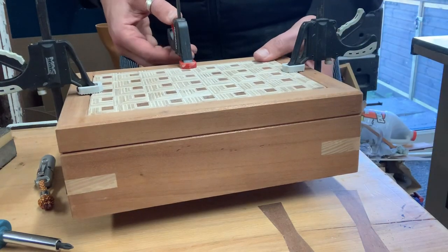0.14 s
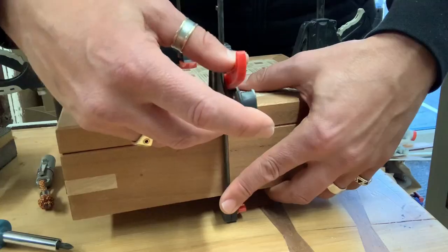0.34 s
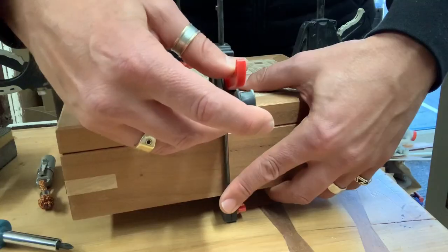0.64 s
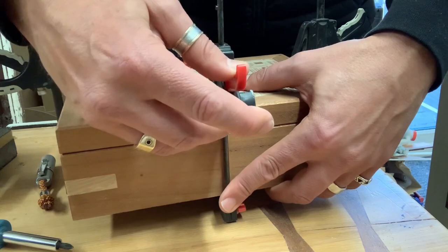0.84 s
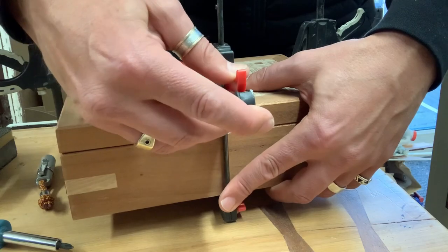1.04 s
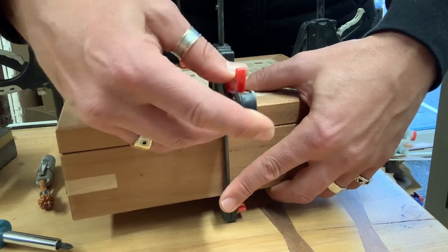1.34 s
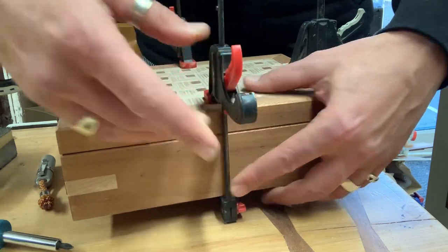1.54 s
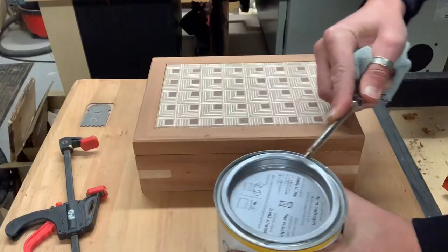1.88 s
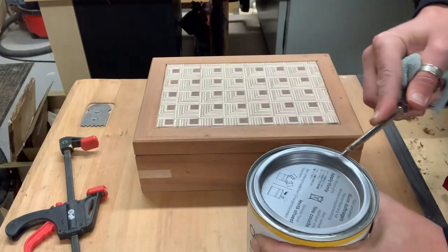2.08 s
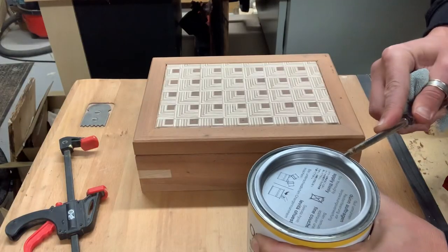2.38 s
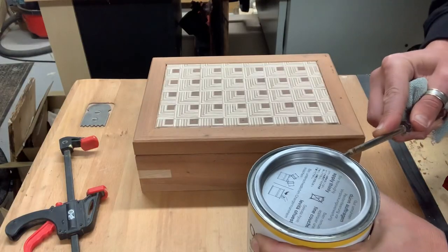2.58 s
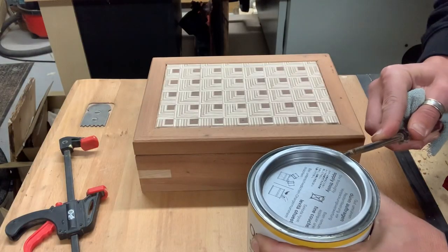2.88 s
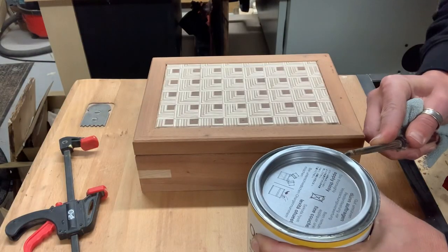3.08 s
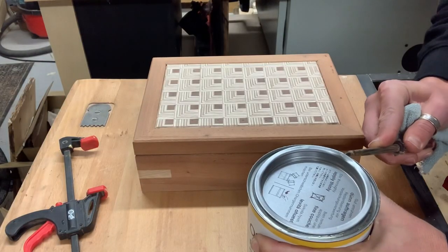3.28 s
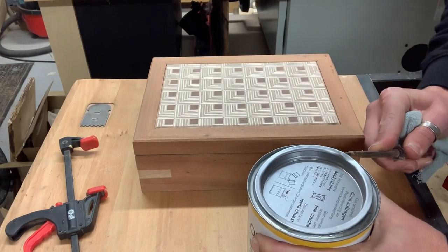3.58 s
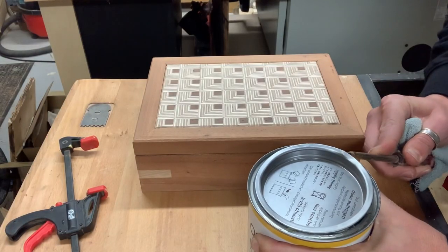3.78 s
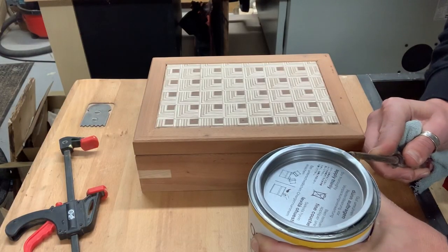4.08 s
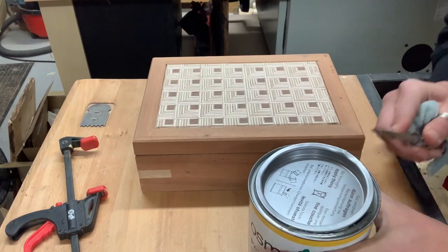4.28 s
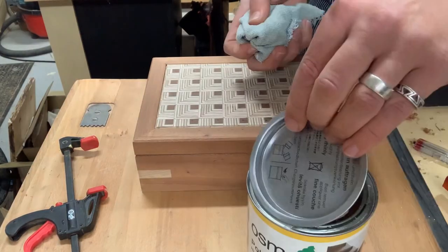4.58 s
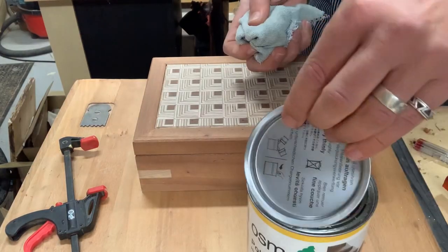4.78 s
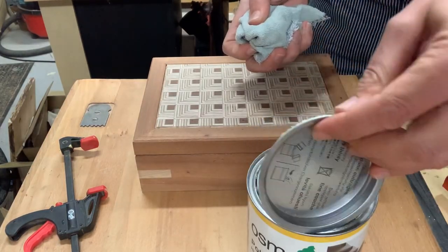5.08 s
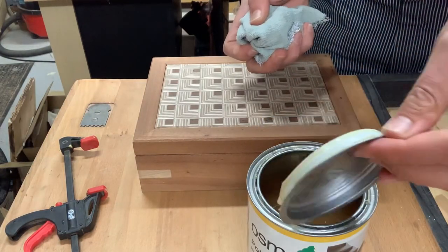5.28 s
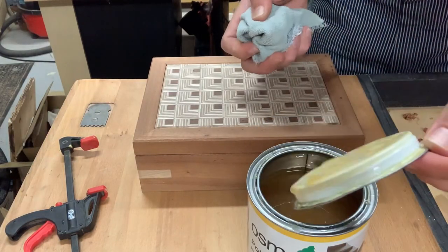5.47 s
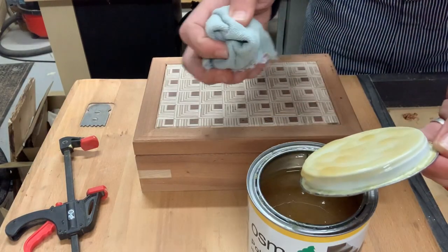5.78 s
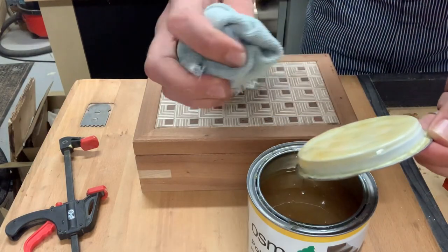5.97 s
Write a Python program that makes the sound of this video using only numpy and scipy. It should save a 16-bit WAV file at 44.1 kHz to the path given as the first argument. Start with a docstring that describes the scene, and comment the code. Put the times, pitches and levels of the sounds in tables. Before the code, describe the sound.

A nearby phone microphone picks up soft wooden bumps and a clamp sliding loose in near silence. Suddenly broad fan noise fills the small shop. A tin judders briefly over the bench, followed by five very loud, short tinny snaps at uneven intervals, with a woody thump beneath. The tool slips with a knock and rasp, light metal clicks follow, and the fan continues to the end.

```python
"""A workbench close to a phone with two microphone ports. First a quiet shop: hands knock a wooden box,
with small ticks and rubs, and slide a clamp off. After a cut an extractor fan roars steadily as filtered
noise; a paint tin is dragged near in irregular slips, and a screwdriver pops its lid round the rim five times,
ringing tin, lid and bench modes. It slips and scrapes, and the lid is lifted with small ticks."""
import sys
import numpy as np
from scipy import signal
from scipy.fft import rfft, irfft, next_fast_len
from scipy.io import wavfile
from scipy.ndimage import uniform_filter1d

SR = 44100
rng = np.random.default_rng(int(sys.argv[2]) if len(sys.argv) > 2 else 0)


def dump(signal):
    """Clip the signal to [-1, 1] and save it as 16-bit WAV at the path in sys.argv[1]."""
    limited = np.clip(np.atleast_2d(signal).T, -1, 1)
    pcm = np.round(limited * 32767).astype(np.int16)
    wavfile.write(sys.argv[1], SR, pcm)


N = 270333
T = np.arange(N) / SR  # seconds
CUT_S = 1.779  # the quiet shop gives way to the fan
# Bending waves carry low notes slowly: each mode peaks this many of its own cycles late.
WOOD_LATE_CYCLES, TIN_LATE_CYCLES = 2.3, 0.13

# Ringing modes of the wooden box and bench. Each row: pitch in Hz, level in dB, time to fall 60 dB in seconds.
BENCH_MODES = [(90.5, -5.5, 0.27), (158.2, -2.5, 0.17), (178, 4.5, 0.071), (246.2, -3.5, 0.081),
               (264.8, -6.5, 0.047), (349.7, 3.5, 0.039), (379.5, 0, 0.072), (463, 2, 0.087),
               (517.4, -6, 0.23), (681.6, -6.5, .1), (910, -3, 0.1), (1264, -8, .06), (1550, -13, 0.017)]
# Ringing modes of the paint tin. Each row: pitch in Hz, level in dB, time to fall 60 dB in seconds.
TIN_MODES = [(556, -9, .06), (650, -10.5, .07), (731.4, 0, 0.072), (832, -4, 0.045), (868, -6, 0.045),
             (970, -6.5, 0.02), (1005, -6.5, .06), (1326, 0, 0.043), (1372, 7.5, 0.018),
             (1442, -1.5, 0.045), (1567, -7.5, 0.037), (1676, 0.5, 0.053), (1640, -14, 0.019),
             (1790, -18, 0.026), (2050, -27.5, 0.012), (2200, -14.5, .05), (2520, -15.5, 0.036),
             (3040, -5.5, 0.06), (3705, -18.5, .06)]
# Likeness of the two ports in a diffuse field. Each row: frequency in Hz, likeness from 0 to 1.
PORT_LIKENESS = [(25, .6), (130, .78), (300, .4), (640, .1), (4000, .1), (6500, .45), (7400, 1), (9300, 1),
                 (10500, .7), (11800, 1), (20000, 1)]


def undb(db):
    """Decibels to amplitude gain."""
    return 10 ** (np.asarray(db) / 20)


def on_hz(table, size):
    """A (Hz, value) table on the bins of a transform, straight on log frequency."""
    t = np.array(table, float)
    bins_hz = np.fft.rfftfreq(size, 1 / SR)
    return np.interp(np.log(bins_hz + 1), np.log(t[:, 0]), t[:, 1])


def noise(spectrum, alike=None):
    """Two-port noise of rms 1; without a likeness table it is the same at both ports."""
    size = next_fast_len(N)
    a, b = rfft(rng.standard_normal((2, size))) * undb(on_hz(spectrum, size))
    c = 1 if alike is None else on_hz(alike, size)
    x = irfft(np.array([a, c * a + np.sqrt(1 - c ** 2) * b]), size)[:, :N]
    return x / x.std()


def walk(rate):
    """Random levels held 1 / rate s and slewed twice; spread near 1."""
    k = int(SR / rate)
    steps = np.repeat(rng.standard_normal(N // k + 1), k)
    return 1.5 * uniform_filter1d(uniform_filter1d(steps, k), k)[:N]


def ring(modes, push_ms, scatter_db, favour_hz=0, damping=1, focus_db=11, late_cycles=WOOD_LATE_CYCLES):
    """Half a second of modes set off by a half-sine push, low ones swelling later, strengths varied. Peak 1."""
    t = T[:SR // 2]
    hz, db, t60 = np.transpose(modes)[:, :, None]
    chance = rng.standard_normal((2, len(modes), 1))  # each blow lands elsewhere
    if favour_hz:  # modes near the struck spot's own pitch answer most
        db = db - focus_db * np.minimum(abs(np.log2(hz / favour_hz)), 1.5)
    late = late_cycles / hz
    swell = np.clip(t / late, 0, 1) ** 2
    tone = np.sin(2 * np.pi * hz * (1 + .006 * chance[1]) * (t - late))
    fall_db = 60 * np.maximum(t - late, 0) * damping / t60
    x = swell * undb(db + scatter_db * chance[0] - fall_db) * tone
    k = max(push_ms * SR / 1000, 2)  # push length in samples
    push = np.sin(np.pi * np.arange(0, k) / k)
    x = np.convolve(x.sum(0), push)[:len(t)]
    return x / abs(x).max()


def burst(hz_lo, hz_hi, t60):
    """A dying spray of band noise, peak near 1."""
    t = T[:SR // 2]
    band = signal.butter(2, [hz_lo, hz_hi], "band", fs=SR, output="sos")
    x = signal.sosfilt(band, rng.standard_normal(len(t)))
    return x / (2 * x.std()) * undb(-60 * t / t60)


def add(track, s, x):
    """Lay a sound on the track from s seconds."""
    i = int(s * SR)
    track[i:i + len(x)] += x[:N - i]


def stroke(start_s, hold_s, swell_s, fade_s):
    """Gain of a sliding contact: swells evenly in dB, holds at 1, fades."""
    away = np.maximum((start_s - T) / swell_s, (T - start_s - hold_s) / fade_s)
    return undb(-30 * np.maximum(away, 0))  # 30 dB over each swell or fade time


def shop():
    """Quiet air of the shop before the cut: diffuse low noise that wavers in level."""
    # Each row: frequency in Hz, level in dB per Hz.
    shop_spectrum = [(15, -28), (25, 8), (148, -17.5), (332, -16), (642, -16), (1730, -22), (1890, -25),
                     (2000, -36), (2600, -59.5), (4400, -120)]
    return noise(shop_spectrum, PORT_LIKENESS) * undb(-82 + 0.94 * walk(11.0))


def self_noise():
    """The microphones' own steady hiss, a little louder after the cut."""
    # Each row: frequency in Hz, level in dB per Hz.
    hiss_spectrum = [(800, -19.5), (2000, -1), (12000, -3.5), (14500, -14.5), (15200, -32)]
    return noise(hiss_spectrum, PORT_LIKENESS) * undb(np.where(T < CUT_S, -85, -82.5))


def knocks():
    """Dull blows on hollow wood, each with a contact click 2.2 ms after its start."""
    # Each row: start in seconds, level in dB, click against that level in dB, push in ms,
    # favoured pitch in Hz, damping by the hand as a factor on the decay rate (at least 0.3 is used).
    blows = [(0.008, -58, -13.5, 2.1, 179, 0.28), (0.036, -54.5, -10.5, 2, 180, 0.51),
             (0.079, -53.5, 3.5, 2, 350, 0.89), (0.1, -40, -9, 1.94, 387, 0.78),
             (0.119, -49.5, -9, 1.9, 240, 2), (0.132, -47, -16, 2, 103, 2.1),
             (0.28, -66.5, -10, 2.8, 100, 1.4), (0.328, -40, -6, 0.98, 258, 0.88),
             (0.342, -36.5, -42, 1.5, 167, 0.76), (0.476, -68, 3, 0.75, 322, 1.8),
             (0.493, -43.5, -38, 2, 232, 1.9), (0.596, -42.5, -43, 2.3, 188, 1.4),
             (0.656, -60, -30, 1.3, 144, 3.1), (0.745, -59, -21, 0.77, 128, 5.6),
             (0.779, -52.5, -12.5, 3.3, 234, 1.8), (1.057, -42.5, -41, 2.8, 209, 0.83),
             (1.215, -53.5, -50, 2.4, 314, 2.1), (1.327, -61, -24, 2.3, 197, 0.4),
             (1.38, -24.5, -16, 0.28, 218, 1.47), (1.408, -33, -34, 0.69, 187, 0.61),
             (3.76, -30, -5, 1.6, 294, 0.59), (3.793, -33.5, -5.5, 2.9, 214, 4.4)]
    out = np.zeros(N)
    for s, db, click_db, push_ms, hz, damping in blows:
        wood = ring(BENCH_MODES, push_ms, 0.88, hz, max(damping, .3))
        add(out, s, undb(db) * wood)
        click = burst(350, 1380, 0.091) + undb(-10.0) * burst(2100, 11000, 0.012)
        add(out, s + 0.0022, undb(db + click_db) * click)
    return out


def ticks():
    """Tiny hard contacts of steel on clamp and rim, many with a clear tin ring."""
    # Each row: start in seconds, level in dB, then against it tin ring in dB and top treble in dB,
    # and brightest pitch in Hz.
    contacts = [(0.0823, -56, -2, -18, 5930), (0.1026, -45.5, -5, -24, 5320), (0.904, -72.5, -3, 8, 3490),
                (1.3762, -50, 3, -27, 3940), (1.4413, -50.5, -4, -7, 4830), (3.6696, -64, 10, -15, 3600),
                (4.2053, -48, 14, 4.5, 5040), (4.2243, -50, 6, -5, 3230), (4.261, -58, 14, 8, 4130),
                (4.269, -55, 2, 3, 4100), (4.277, -56, 0, 11, 3380), (4.59, -61, 4, -9, 5150),
                (4.5967, -58, -14, -2, 3450), (4.6176, -47.5, 7.5, 12.5, 5130), (4.8424, -56, 0, -20, 4100)]
    out = np.zeros(N)
    for s, db, tin_db, top_db, hz in contacts:
        ping = burst(hz / 1.07, hz * 1.07, .03)
        click = ping + undb(-1) * burst(2900, 8950, 0.02) + undb(top_db) * burst(6000, 12200, 0.019)
        tin = ring(TIN_MODES, 0.078, 2.6, 1800, focus_db=2.2, late_cycles=TIN_LATE_CYCLES)
        add(out, s, undb(db) * (click + undb(tin_db) * tin))
    return out


def rubs():
    """Skin and steel slide: a grainy hiss and rasp that catch together."""
    # Each row: hold start in seconds, hold, swell and fade in seconds, hiss in dB, rasp in dB,
    # rasp centre in Hz, rasp width in octaves, hiss tilt in dB per octave.
    slides = [(0.174, .005, 0.26, 0.13, -74.5, -76, 3400, 1.2, -11),
              (0.792, .01, 0.022, 0.035, -80, -83.5, 3550, 1.3, -12),
              (1.444, .004, 0.049, 0.18, -68.5, -67.5, 3740, 0.94, -10),
              (1.58, 0.197, 0.36, .006, -78.5, -75.5, 3720, 3.3, 3),
              (1.892, .11, 0.089, 0.13, -69.5, -67.5, 3500, 1.8, 23.5),
              (3.68, 0.043, 0.026, .05, -62.5, -84, 3600, 2.2, -11.5),
              (3.752, 0.029, 0.062, 0.036, -41, -46.5, 3340, 3.4, -5),
              (4.285, .006, 0.079, 0.056, -61, -68.5, 4000, 1.2, -2),
              (4.23, .12, 0.08, .15, -95, -58.5, 850, 2.6, 2),
              (4.616, .002, 0.012, .05, -64, -62, 4500, 1.4, -3),
              (5.014, 0.042, .05, 0.35, -88, -73.5, 4820, 0.53, -5)]
    # Hiss before its tilt. Each row: frequency in Hz, level in dB per Hz.
    hiss_spectrum = [(4000, -40), (6500, -6), (9000, -2), (12000, 0), (14500, -2), (15600, -14)]
    grain = undb(3.4 * walk(300))
    out = 0
    for s, hold_s, swell_s, fade_s, hiss_db, rasp_db, hz, octaves, tilt_db in slides:
        hiss = noise([(f, d + tilt_db * np.log2(f / 12000)) for f, d in hiss_spectrum])[0]
        rasp_spectrum = [(hz / 2 ** (3 * octaves), -40), (hz / 2 ** (octaves / 2), -3), (hz, 0),
                         (hz * 2 ** (octaves / 3), -4), (hz * 2 ** octaves, -40)]
        rasp = noise(rasp_spectrum)[0]
        contact = undb(hiss_db) * hiss + undb(rasp_db) * rasp
        out = out + stroke(s, hold_s, swell_s, fade_s) * grain * contact
    return out


def fan():
    """Broad air roar with wavering duct resonances."""
    # Each row: frequency in Hz, level in dB per Hz.
    roar_spectrum = [(15, -78), (25, -26.5), (91, -14), (161, -17), (190, -10), (240, -14.5), (327, -5.5),
                     (385, -9), (444, -11), (589, -5.5), (1060, -11), (1870, -13.5), (7000, -45.5),
                     (9100, -74), (15400, -120)]
    # Duct resonances. Each row: pitch in Hz, width in Hz, level in dB against the roar.
    duct_modes = [(102.2, 8, -28), (195.6, 10, -14.5), (445.4, 31.6, -5), (691.5, 27, -11.5),
                  (1076.5, 44, -9), (1193, 58, -20), (1625, 80, -27.5), (1843, 41, -14.5), (2490, 120, -18),
                  (3253, 930, -16.5)]
    before_lift = T < 4.74  # a second cut: the fan is heard from a slightly other place
    roar_db = np.where(before_lift, -54, -55.5)
    hum_db = np.where(before_lift, -2, 2)  # extra level of the one resonance between 400 and 500 Hz
    out = noise(roar_spectrum, PORT_LIKENESS) * undb(1.0 * walk(14))
    for hz, width_hz, mode_db in duct_modes:
        peak = [(hz - 3 * width_hz, -60), (hz - width_hz / 2, -4), (hz, 0),
                (hz + width_hz / 2, -4), (hz + 3 * width_hz, -60)]
        level_db = mode_db + 1.1 * walk(24) + hum_db * (400 < hz < 500)
        out = out + noise(peak, PORT_LIKENESS) * undb(level_db)
    return out * undb(roar_db)


def drag():
    """Irregular slips of the tin's foot shake the bench and rattle the tin."""
    slips_per_s = np.array([[1500], [900]])  # bench, tin
    slips = (rng.random((2, N)) < slips_per_s / SR) * rng.standard_normal((2, N))
    bench = ring(BENCH_MODES, 4.5, 0, 92, 2.1)
    tin = ring(TIN_MODES, 0.12, 0, damping=2.73, late_cycles=TIN_LATE_CYCLES)
    low = signal.fftconvolve(slips[0], bench)[:N]
    rattle = signal.fftconvolve(slips[1], tin)[:N]
    push = stroke(1.892, 0.12, swell_s=0.081, fade_s=0.26)
    return push * (undb(-39) * low / low.std() + undb(-52) * rattle / rattle.std())


def pops():
    """The lid edge snaps free: tin, lid and bench ring, steel cracks and clatters, the seal hisses."""
    # Each row: start in seconds, level in dB, then against it bench thump, crack, seal hiss and lid ring in dB,
    # lid pitch in Hz, lid ringing time in seconds, favoured tin pitch in Hz, tin damping as a factor.
    snaps = [(2.2184, -0.5, -22.5, -5, -56, -21, 704.5, 0.13, 1285, 1),
             (2.6589, -3, -14, -25.5, -50, -22.5, 712.5, .14, 690, 1.2),
             (2.949, -6, -25, -35.5, -60, -21, 745, 0.12, 785, 0.67),
             (3.25, -2.5, -16.5, -24.5, -53, -31, 711.4, 0.16, 1300, 1.4),
             (3.482, 1.5, -20, -29, -50, -23.5, 765.6, 0.11, 754, 1.5)]
    # Split lid mode. Each row: multiple of the lid pitch, level in dB, time to fall 60 dB in seconds.
    lid_modes = [(0.956, -6.5, 0.45), (1.003, -14.5, 0.99), (1.042, -5.5, .35)]
    out = np.zeros(N)
    rattle = undb(2.2 * walk(53))  # the loose lid rattles as it rings
    for s, db, thump_db, crack_db, hiss_db, lid_db, lid_hz, lid_s, hz, damping in snaps:
        # the lid edge strikes the rim again 3.11 ms later, 7.5 dB weaker
        for lag_s, blow_db in ((0, 0), (0.00311, -7.5)):
            tin = ring(TIN_MODES, 0.29, 0.92, hz, damping, focus_db=5.0, late_cycles=TIN_LATE_CYCLES)
            add(out, s + lag_s, -undb(db + blow_db) * tin)
        lid = ring(np.array(lid_modes) * [lid_hz, 1, 1], 1.0, 0.45, late_cycles=TIN_LATE_CYCLES)
        lid *= rattle[int(s * SR):][:SR // 2]
        # the hand damps the lid and stops its ringing, at 898 dB per second
        lid *= undb(-898 * np.maximum(T[:SR // 2] - lid_s, 0))
        clatter = undb(-11) * burst(500, 1500, 0.034)
        clatter += undb(-38.5) * burst(1445, 2380, 0.29) + undb(-34.5) * burst(980, 13000, 0.009)
        crack = undb(crack_db) * burst(8500, 15000, 0.0074)
        seal_hiss = undb(hiss_db) * burst(4500, 15000, 0.16)
        add(out, s, undb(db) * (undb(lid_db) * lid + clatter + crack + seal_hiss))
        # the blow reaches the bench through the tin
        thump = ring(BENCH_MODES, 1.0, 0.65, 230, 0.77, focus_db=5.5, late_cycles=1.1)
        add(out, s, undb(db + thump_db) * thump)
    return out


def room(x):
    """The shop answers with a diffuse tail of decaying noise bands, each with its own decay time."""
    # Each row: band centre in Hz, time to fall 60 dB in seconds, level in dB.
    room_bands = [(60, 1, -5), (254.4, 0.15, -6), (940, 0.26, -9), (4000, 0.1, -2), (12000, 0.24, -19)]
    t, tail = T[:SR // 2], 0
    spray = noise([(20, 0), (20000, 0)], PORT_LIKENESS)[:, :len(t)]
    for hz, t60, db in room_bands:
        band = signal.butter(1, [hz / 2, min(hz * 2, .45 * SR)], "band", fs=SR, output="sos")
        decay = signal.sosfilt(band, spray) * undb(-60 * t / t60) * np.clip(t / 0.0007, 0, 1)
        # long and short decays are scaled to like energy
        tail = tail + undb(db) * decay / np.sqrt(t60 * SR / (2 * np.log(1000)))
    return signal.fftconvolve(x[None], tail, axes=1)[:, :N]


def scene():
    """Close sounds with their room tail, over the shop air, then the fan, and the microphone hiss."""
    near = knocks() + ticks() + rubs() + drag() + pops()
    # small things radiate no deep bass
    near = signal.sosfilt(signal.butter(3, 96, "high", fs=SR, output="sos"), near)
    after = np.clip((T - CUT_S) / 0.012, 0, 1)
    return near + room(near) + (1 - after) * shop() + after * fan() + self_noise()


def record(dry):
    """The right port hears more bass and a phase that turns in the treble; peaks are rounded, the top is cut."""
    # Right port against left. Each row: frequency in Hz, level in dB.
    port_balance = [(30, 2), (200, 5.5), (420, 5), (720, 0), (1100, -1), (5500, -1.5), (7400, 3.5),
                    (20000, -3.5)]
    # Right port ahead of left. Each row: frequency in Hz, phase in radians.
    port_lead = [(0, 0), (200, -.15), (400, -.3), (720, -1.6), (1100, -.2), (2000, -.6), (5500, .3),
                 (7500, 3.0), (9200, 3.3), (11300, 5.6), (13300, 6.5), (15300, 9.2), (17000, 9.6)]
    size = next_fast_len(N + 4096)
    lead = np.interp(np.fft.rfftfreq(size, 1 / SR), *np.transpose(port_lead))
    half = undb(on_hz(port_balance, size) / 2)
    response = np.array([1 / half, half * np.exp(1j * lead)])
    ports = irfft(rfft(dry, size) * response, size)[:, :N]
    rounded = .88 * np.tanh(ports / .88)
    return signal.sosfilt(signal.ellip(12, .2, 100, 16200, fs=SR, output="sos"), rounded)


dry = scene()
out = record(dry)
dump(out)
```